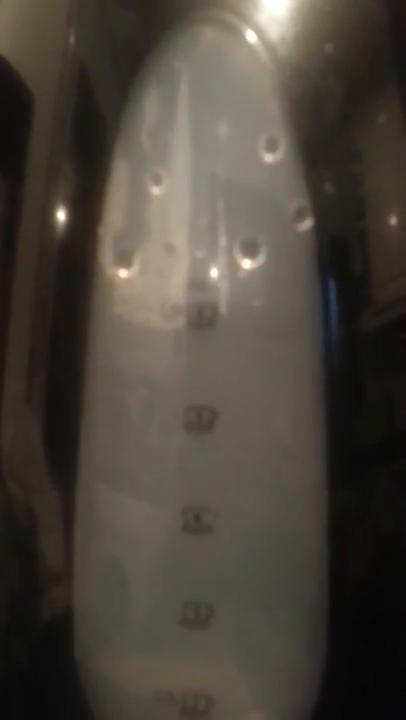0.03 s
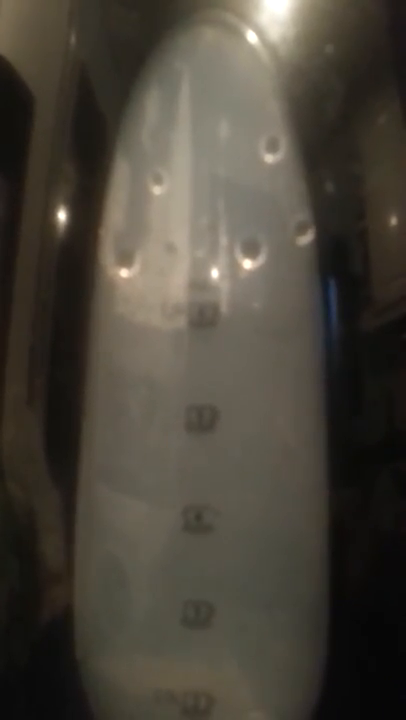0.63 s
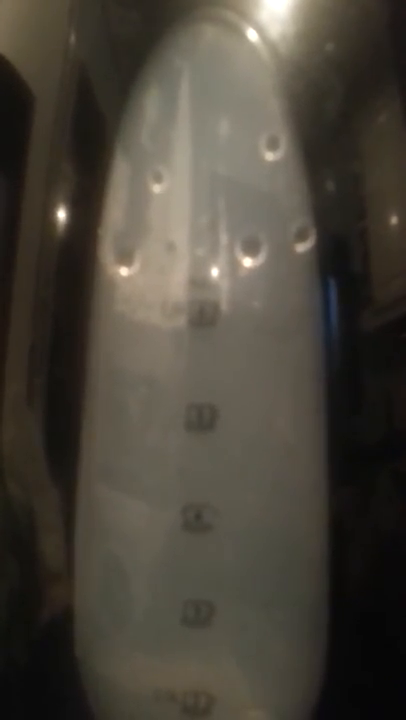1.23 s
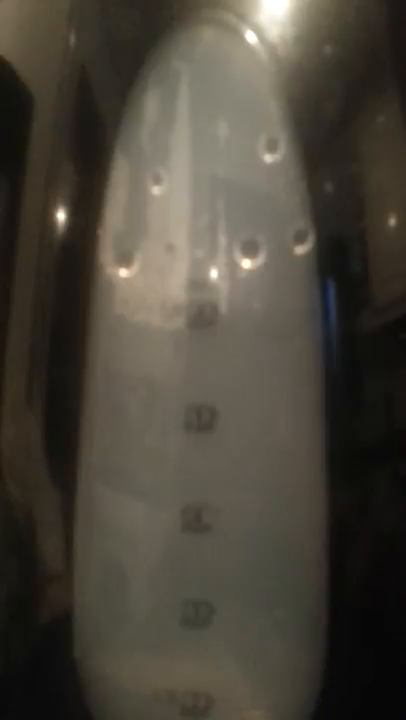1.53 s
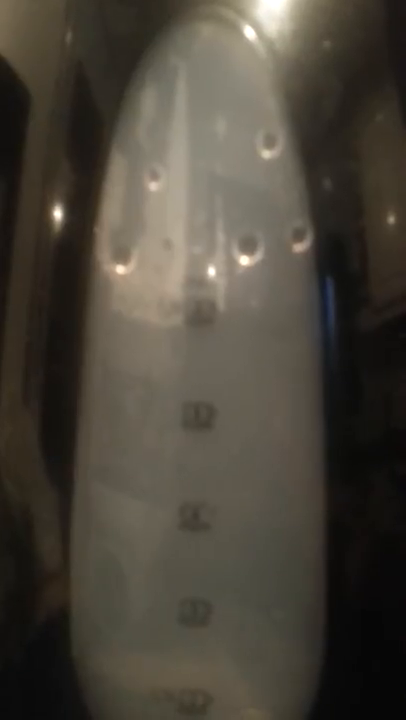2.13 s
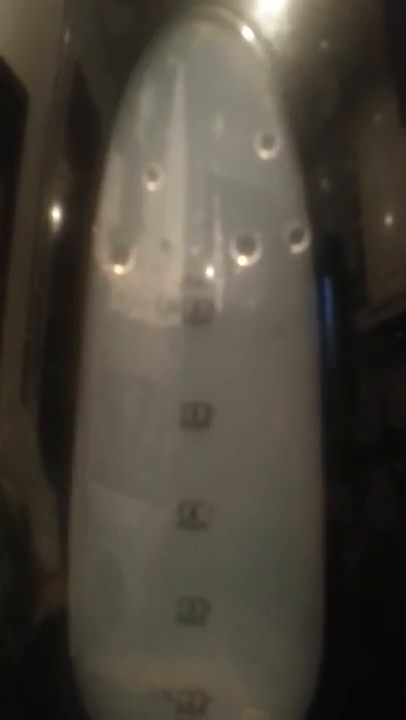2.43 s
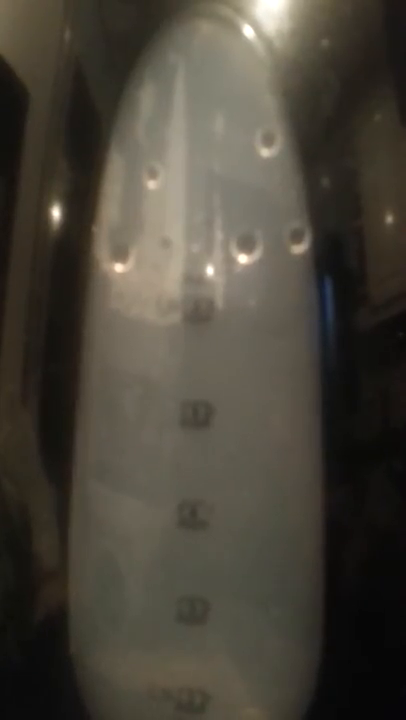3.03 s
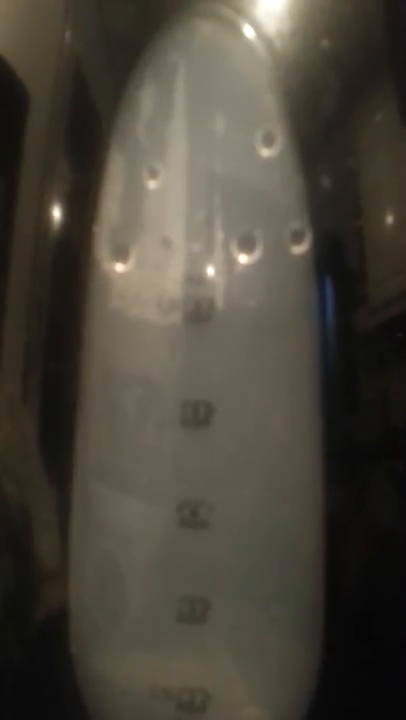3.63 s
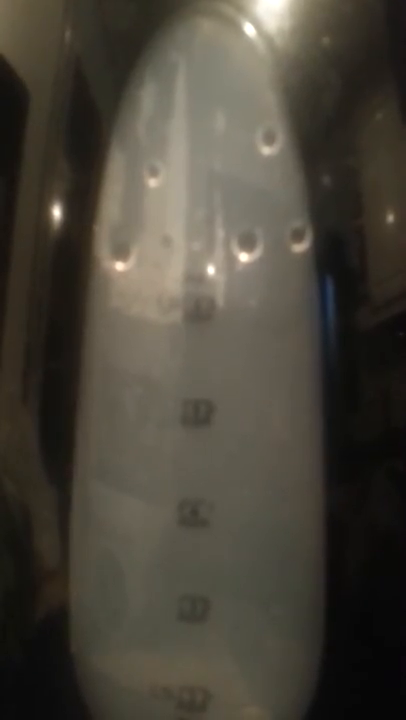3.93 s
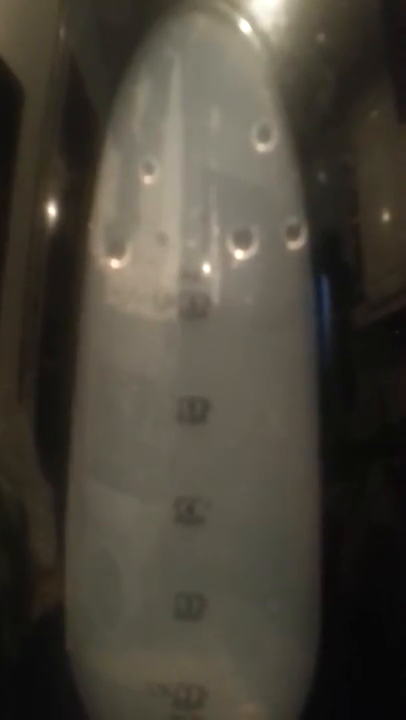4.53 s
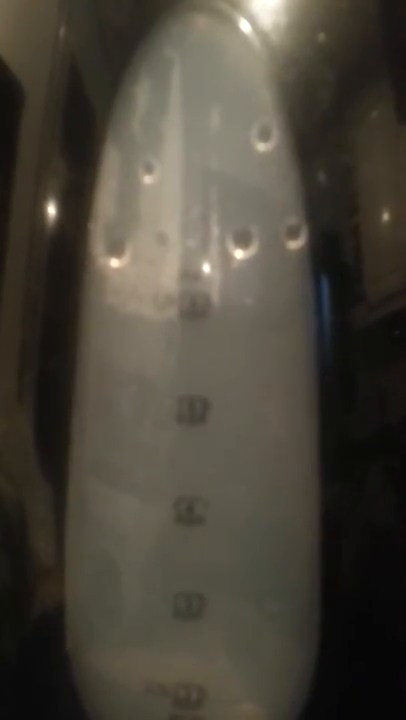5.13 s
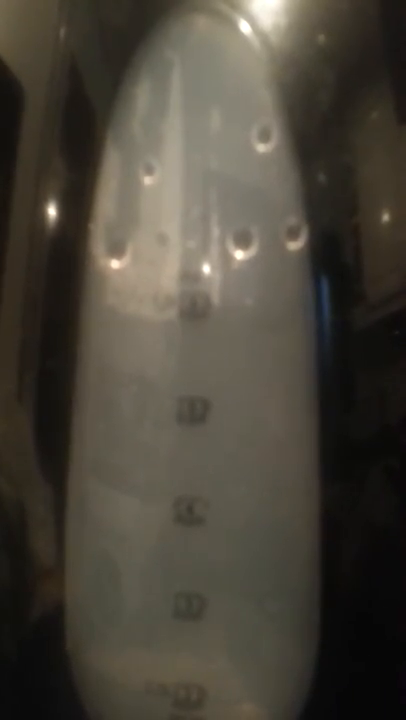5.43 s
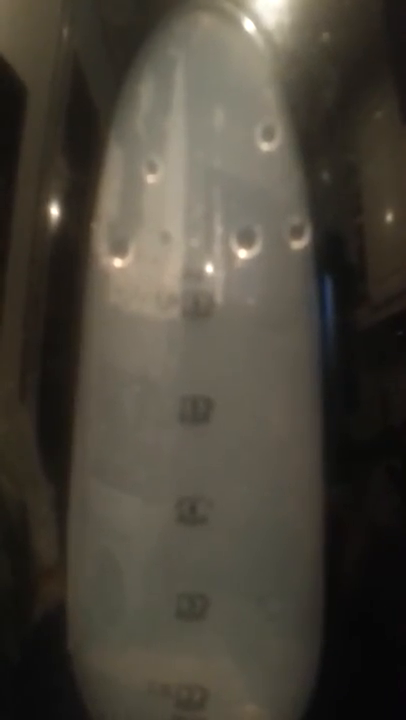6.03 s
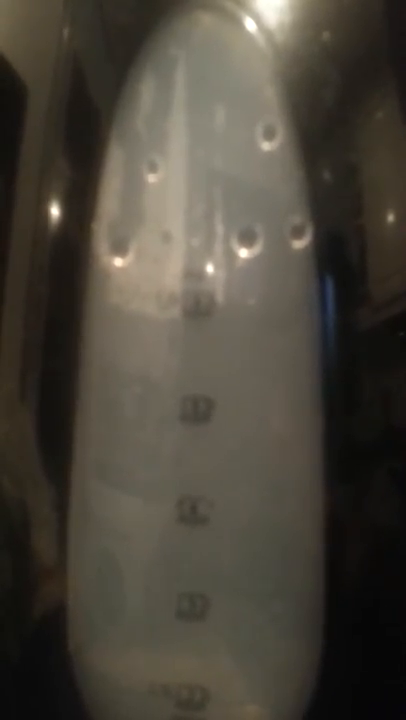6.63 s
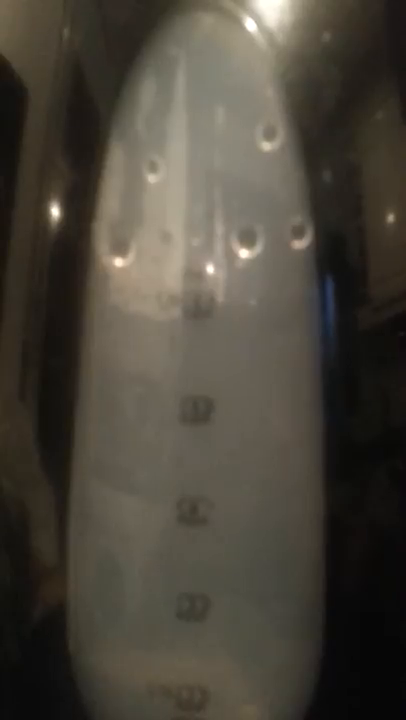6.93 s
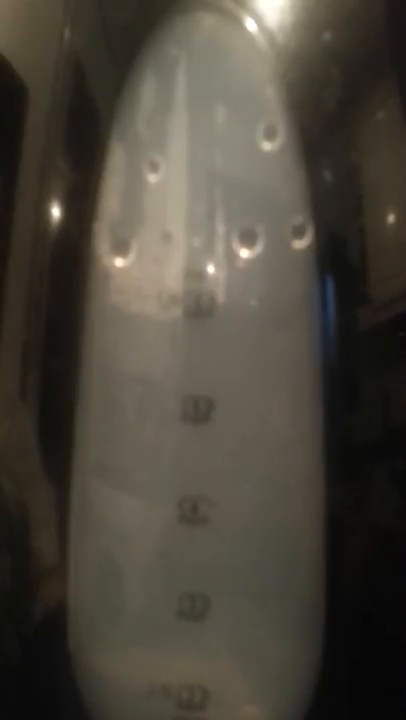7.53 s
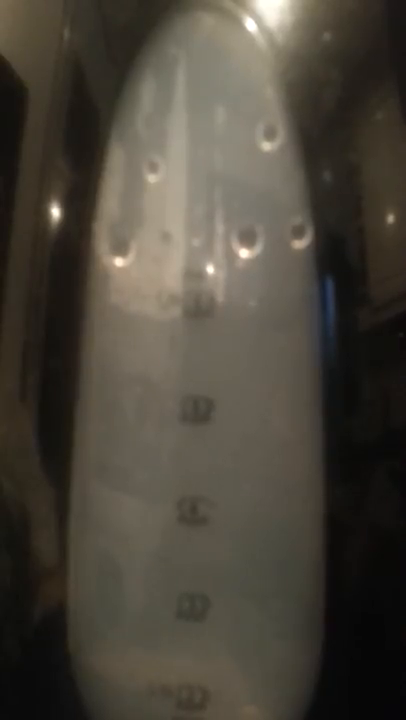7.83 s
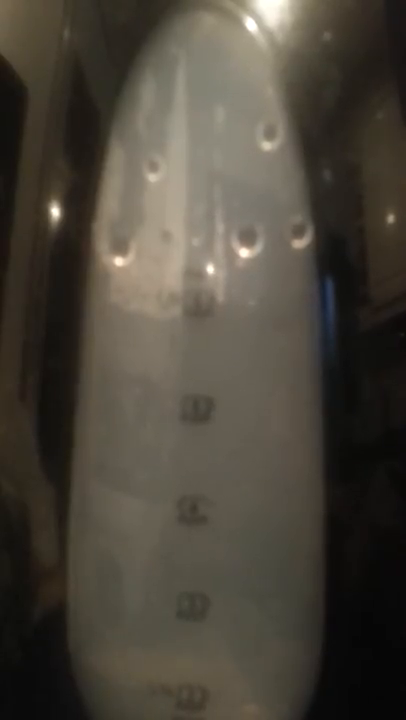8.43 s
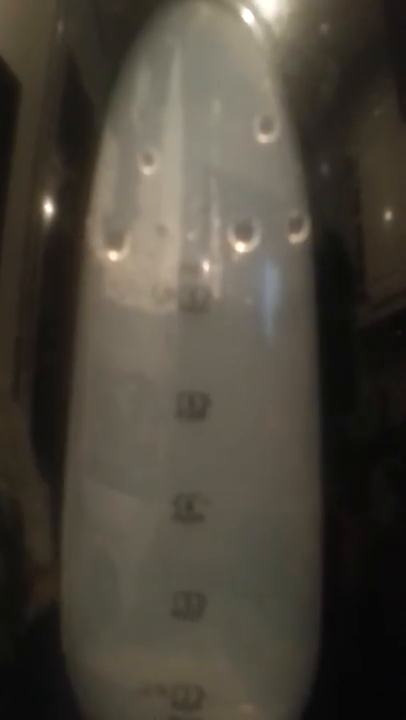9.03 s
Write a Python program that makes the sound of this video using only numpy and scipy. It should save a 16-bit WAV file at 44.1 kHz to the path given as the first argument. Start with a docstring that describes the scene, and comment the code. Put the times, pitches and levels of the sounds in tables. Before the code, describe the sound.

After a faint hum, water in an electric kettle begins to sizzle and builds to a steady rush with light gurgling.

```python
"""A small kitchen: an electric kettle starts to heat water, close by, over room air and a mains hum.
Steam bubbles form on the hot plate and collapse in the cooler water; each collapse knocks the kettle's
resonances. A fine sizzle grows into a rushing roar as the bubbles multiply and swell, with bigger ones
gurgling and popping through it. The worktop rumbles, three dry ticks sound, hard walls add a short tail."""
import sys
import numpy as np
from scipy import signal
from scipy.fft import rfft, irfft, next_fast_len
from scipy.io import wavfile
from scipy.ndimage import map_coordinates

SR = 44100
rng = np.random.default_rng(int(sys.argv[2]) if len(sys.argv) > 2 else 0)


def log_audio(samples):
    """Write samples as a 16-bit WAV file to the path given in sys.argv[1]."""
    # one column per channel
    frames = np.atleast_2d(samples).T
    # limit to full scale, then quantise
    limited = np.clip(frames, -1, 1)
    pcm = np.round(limited * 32767).astype(np.int16)
    wavfile.write(sys.argv[1], SR, pcm)


N = 410130
TIME_S = np.arange(N) / SR


def amp(db):
    """Decibels to gain."""
    return 10 ** (np.asarray(db) / 20)


def unit(x):
    """Scale to rms 1."""
    return x / np.sqrt(np.mean(x ** 2) + 1e-20)


def at_hz(rows, hz):
    """Read (Hz, value) rows on a log axis."""
    knots_hz, values = np.transpose(rows)
    return np.interp(np.log(hz + 1), np.log(knots_hz + 1), values)


def at_time(rows, t):
    """Read (seconds, value) rows at times t."""
    return np.interp(t, *np.transpose(rows))


def wobble(knots_per_s, t):
    """Smooth random curve at times t."""
    return map_coordinates(rng.standard_normal(4096), [t * knots_per_s], mode="mirror")


def filtered(x, response):
    """Apply a gain given as a function of Hz."""
    size = next_fast_len(N + SR // 2)
    return irfft(rfft(x, size) * response(np.fft.rfftfreq(size, 1 / SR)), size)[..., :N]


def noise(spectrum_db, likeness):
    """Stereo noise of rms 1 with a given colour and left-right likeness."""
    def mid_side_gains(hz):
        angle = np.arccos(at_hz(likeness, hz)) / 2
        return amp(at_hz(spectrum_db, hz)) * [np.cos(angle), np.sin(angle)]
    mid, side = filtered(rng.standard_normal((2, N)), mid_side_gains)
    return unit(np.array([mid + side, mid - side]))


# Each row: frequency in Hz, relative density in dB.
AIR_SPECTRUM_DB = [(76, -33), (130, -5), (220, -3.5), (255, 4), (305, 0), (350, -3), (420, -4.5),
                   (500, -3.5), (640, -3), (1000, -9.5), (2400, -14.5), (5800, -20), (9500, -34),
                   (14500, -73)]
# Each row: frequency in Hz, left-right likeness 0-1.
AIR_LIKENESS = [(60, 0.87), (240, 0.73), (950, 0.2), (3770, 0.04), (15000, 0.01)]


def room_air(level_db):
    """Steady air of a quiet room, wider in the treble."""
    return amp(level_db) * noise(AIR_SPECTRUM_DB, AIR_LIKENESS)


# Each row: time in seconds, level in dB.
HISS_LEVEL_DB = [(0, -60.5), (1.9, -59), (2.5, -55), (3.2, -80.5), (9.3, -93)]
# Each row: frequency in Hz, relative density in dB.
HISS_SPECTRUM_DB = [(5000, -41), (7000, -2), (9500, -1.5), (10500, -1), (14500, -3)]


def hiss():
    """Faint top hiss that fades away from about 2.5 s."""
    return amp(at_time(HISS_LEVEL_DB, TIME_S)) * noise(HISS_SPECTRUM_DB, likeness=[(100, 0.0037)])


# Each row: time in seconds, level in dB.
HUM_LEVEL_DB = [(0.1, -50), (1.26, -49.5), (2.08, -46), (2.79, -50), (4.84, -51.5), (5.42, -47.5),
                (5.8, -52.5), (8.84, -52.5), (9.2, -51)]
# Each row: harmonic number, relative level in dB.
HUM_HARMONICS = [(1, -1), (2, -36), (3, -14), (5, -18)]


def mains_hum(hz):
    """Mains hum with a few weak overtones."""
    tone = sum(amp(db) * np.sin(2 * np.pi * (k * hz * TIME_S + rng.random())) for k, db in HUM_HARMONICS)
    return amp(at_time(HUM_LEVEL_DB, TIME_S)) * unit(tone)


# Each row: frequency in Hz, relative density in dB.
WORKTOP_SPECTRUM_DB = [(20, -16.5), (40, -3), (70, 2), (130, 3), (170, 8.5), (210, -6.5), (255, 15),
                       (290, 0), (340, -31), (600, -86.5)]


def worktop_rumble(floor_db, shake_db):
    """Low rumble that grows as the kettle shakes the worktop."""
    boil_db, _, _ = boiling(TIME_S)
    gain = np.hypot(amp(floor_db), amp(boil_db + shake_db))
    return gain * noise(WORKTOP_SPECTRUM_DB, likeness=[(100, 0.37)])


# Each row: start in seconds, level in dB, pitch in Hz, t60 in seconds.
DRY_TICKS = [(0.1075, -25.5, 930, 0.0049), (5.47, -25.5, 12000, .002), (5.846, -32.5, 12300, 0.002)]


def ticks(spray_db, spray_t60_s):
    """Heavily damped rings, each with a little noisy spray at the same pitch."""
    out, t = np.zeros(N + SR), np.arange(SR // 20) / SR
    for start_s, db, hz, t60_s in DRY_TICKS:
        spray = amp(spray_db - 60 * t / spray_t60_s) * wobble(hz / 4, t)
        envelope = amp(db) * (amp(-60 * t / t60_s) + spray)
        out[round(start_s * SR):][:len(t)] += envelope * np.cos(2 * np.pi * hz * t - np.pi / 4)
    return out[:N]


# Each row: time in seconds, share of the plate bubbling 0-1.
BUBBLING_SHARE = [(1.7, .16), (2, .28), (2.5, .6), (3.2, 1)]


def collapses(per_s, spread_db, start_s=1.1):
    """Random times and log-normal sizes of collapses, sparse until the whole plate bubbles."""
    t = np.sort(rng.uniform(start_s, (N - 1) / SR, int(per_s * N / SR)))
    size = amp(spread_db * np.clip(rng.standard_normal(len(t)), -3, 2.3))
    alive = rng.random(len(t)) < at_time(BUBBLING_SHARE, t)
    return t[alive], size[alive]


def knocks(t, push, level_db):
    """Impulses, stronger when few; where a bubble sits decides which way it pushes a mode."""
    sparsity = 1 / at_time(BUBBLING_SHARE, t)
    gap_samples = (t[-1] - t[0]) * SR * sparsity / sparsity.sum()
    impulses = unit(push) * rng.choice([-1, 1], len(t)) * np.sqrt(gap_samples)
    return np.bincount((t * SR).astype(int), impulses * amp(level_db), N)


def ring(drive, hz, width_hz, left_db, right_db, lead_rad):
    """One steep-sided kettle resonance, in stereo."""
    section = np.concatenate(signal.iirpeak(hz, hz / width_hz, SR))
    left = signal.sosfilt([section, section], drive) * np.sqrt(2 * SR / (np.pi * width_hz))
    lag_samples = round(lead_rad / (2 * np.pi * hz) * SR)
    right = np.take(left, np.arange(left.shape[-1]) - lag_samples, axis=-1, mode="clip")
    return np.array([amp(left_db) * left, amp(right_db) * right])


# Each row: time in seconds, drive level in dB.
SINGING_DRIVE_DB = [(1.1, -82), (1.35, -69.5), (1.55, -62.5), (1.7, -53), (1.95, -49.3), (2.05, -45),
                    (2.4, -41.5), (3, -40.5), (4.2, -53), (6, -52), (9.3, -49)]
# Each row: frequency in Hz, width in Hz, left gain in dB, right gain in dB, left lead in radians.
PLATE_MODES = [(376, 71, 0, -5.5, 0.36), (551, 110, -3, -6.5, 1), (1310, 69, -9, -12, -0.6),
               (1690, 90, -14, -17, -0.5), (2270, 75, -8.5, -16, 0), (2750, 70, -16, -14.5, 1.5),
               (3490, 170, -3, -2.5, 0.2), (3747, 180, -4.5, -4, 0.6), (3960, 700, 3, -0.5, -2),
               (4550, 290, -11, -15, 0.5), (5010, 400, -4.5, -13, 1.5), (5640, 420, -9, -7.5, -1.5),
               (7150, 2800, -4.5, -9, 1.5), (9040, 900, -13.5, -31, 0)]


def singing(per_s, spread_db):
    """The first tiny bubbles ring a few resonances on the plate."""
    t, size = collapses(per_s, spread_db)
    drive_db = at_time(SINGING_DRIVE_DB, t)
    return sum(ring(knocks(t, size, drive_db), *mode) for mode in PLATE_MODES)


# Each row: time in seconds, drive level in dB.
SIMMER_DRIVE_DB = [(1.2, -82), (1.5, -64), (1.665, -56.5), (1.685, -49), (1.99, -45), (2.015, -39.5),
                   (2.19, -39.5), (2.23, -36), (2.7, -31.5), (3.35, -27), (4.4, -27), (4.9, -28),
                   (5.55, -26), (5.85, -27.5), (6.6, -26), (7.8, -26.5), (9.3, -23.5)]
# Each row: start in seconds, hold in seconds, lift in dB.
BUBBLE_SWARMS = [(3.671, 0.03, 5), (4.233, 0.017, 6.5), (4.98, 0.071, 4.5), (5.106, 0.1, 4),
                 (5.262, 0.12, 4), (5.429, 0.086, 4), (6.342, 0.027, 1), (6.486, 0.035, 3),
                 (6.976, 0.043, 4), (7.141, 0.12, 3), (7.873, 0.093, 4), (8.06, 0.045, 3),
                 (8.164, 0.04, 2.5), (8.488, 0.033, 4), (8.582, 0.04, 4), (9.048, 0.11, 3)]


def boiling(t, settled_db=-26, attack_s=0.0053, release_s=0.048):
    """Level, bass and treble in dB: growing bubbles deepen and dull the roar, swarms lift its middle."""
    swarm_db = 0
    for start_s, hold_s, lift_db in BUBBLE_SWARMS:
        rise = np.clip((t - start_s) / attack_s, 0, 1)
        fall = np.exp(-np.maximum(t - start_s - hold_s, 0) / release_s)
        swarm_db += lift_db * rise * fall
    steady_db = at_time(SIMMER_DRIVE_DB, t)
    growth_db = steady_db - settled_db
    bass_db = 0.12 * growth_db - 0.15 * swarm_db
    treble_db = -0.18 * growth_db - 0.32 * swarm_db
    return steady_db + swarm_db, bass_db, treble_db


# Each row: frequency in Hz, width in Hz, left gain in dB, right gain in dB, left lead in radians.
KETTLE_MODES = [(319, 17, -15, -16, -0.5), (350, 62.4, -11, -12.5, 0), (392.08, 43, -11, -16.5, 0.07),
                (500.2, 46, -13.5, -18.5, 1.0), (537, 53, -8.5, -13.5, 1.0), (588, 68, -17.5, -20.5, 0.4),
                (630.4, 44, -12.5, -16.5, 0.56), (681, 63, -19.5, -21.5, 0.55), (825, 95, -15, -14, 1.44),
                (909, 250, -10.5, -17.5, 0.5), (1130, 250, -15, -7.5, 3), (1211, 120, -9.5, -23.5, -2),
                (1291.5, 28, -12.5, -14.5, 2), (1311, 58, -16.5, -8.5, 3), (1350, 174, -8, -12.5, 0.5),
                (1476, 36, -16, -24, -1.5), (1509, 180, -6, -11.5, -2.5), (1653.5, 99, -9, -15, -1.1),
                (1729, 120, -12.5, -12.5, -1), (1927, 170, -19, -10.5, -3), (2021, 82, -13, -28.5, 0.4),
                (2078, 69, -12, -29, 2.1), (2196, 87, -8.5, -23.5, 4), (2270, 82, -8.5, -14.5, 0.82),
                (2500, 280, -9, -14.5, 1.7), (2763, 116, -12, -17, 1), (2875, 370, -10, -17, 1),
                (3152, 195, -8, -21, 2), (3368, 240, -9.5, -24.5, 2), (3530, 360, -16, -16, -0.5),
                (3794, 400, -21.5, -12.5, -1.65), (4140, 810, -12, -22, 1.7), (4520, 300, -20.5, -25, 1),
                (5200, 520, -20, -24.5, 1), (5660, 490, -21, -23.5, 2), (6446, 1900, -23, -23, 1.3),
                (7910, 820, -24.5, -40, 4), (9730, 1540, -26, -53, 2)]
# Ring below 450 Hz. Each row: time in seconds, lift in dB before weighting.
LOW_RING_DB = [(1.7, -5), (2.4, 0), (3.3, 1.8), (4.4, 1), (5, 0.5), (5.7, 3), (6.5, -0.5), (7, -0.8),
               (9.3, -1)]
# Ring near 2.2 kHz. Each row: time in seconds, lift in dB before weighting.
MID_RING_DB = [(2, 2), (3.3, 1.5), (4.8, 2), (5.4, 0), (6.2, -0.8), (9.3, -2)]


def simmer(per_s, spread_db, clump_db, clumps_per_s, corner_hz, gain_db):
    """Thousands of collapses a second ring the kettle, in clumps; big bubbles are louder and duller."""
    t, size = collapses(per_s, spread_db)
    size *= amp(clump_db * wobble(clumps_per_s, t))
    level_db, bass_db, treble_db = boiling(t)
    bass_db += 2.05 * wobble(30, t)  # the low knocks come and go
    low_db, mid_db = at_time(LOW_RING_DB, t), at_time(MID_RING_DB, t)
    mid_weights = [(1400, -0.14), (1650, 0.48), (1930, -1.1), (2050, 0.17),
                   (2200, 1.3), (2300, 1.3), (2500, -1.1), (2900, 0.021)]
    out = np.zeros((2, N))
    for hz, *mode in KETTLE_MODES:
        # Each mode follows the four curves with a weight set by its frequency.
        colour_db = at_hz([(400, 1.0), (620, 0.12), (1100, 0.0054)], hz) * (bass_db - 0.5)
        colour_db += at_hz([(1900, 0.27), (3400, 0.51)], hz) * (treble_db + 0.46)
        colour_db += at_hz(mid_weights, hz) * mid_db
        colour_db += at_hz([(420, 0.87), (480, 0.011)], hz) * low_db
        push = size / np.hypot(1, hz * size / corner_hz)
        ringing = ring(knocks(t, push, level_db + colour_db + gain_db), hz, *mode)
        out += cloud_drift(ringing) if 1400 < hz < 3000 else ringing
    return out


def cloud_drift(x, start_s=4.44, swing_s_per_s=0.0001, bends_per_s=9):
    """Passing bubble clouds bend a resonance's pitch, more as the water warms."""
    t = TIME_S[::128]
    delay_s = swing_s_per_s * np.maximum(t - start_s, 0) * wobble(bends_per_s, t)
    bent_s = TIME_S - np.interp(TIME_S, t, delay_s)
    return np.array([np.interp(bent_s, TIME_S, side) for side in x])


def dry_knock(cycles, crest_cycles=0.56, sharp_share=0.17, pan_db=3):
    """Knocks of collapsing bubbles, one per row: they start sharp, sag in pitch and lean left."""
    age = cycles / crest_cycles
    extra_turns = 2 * sharp_share * crest_cycles * (1 - np.exp(-age / 2))
    turns = cycles + extra_turns + rng.random((len(cycles), 1))
    knock = age * np.exp(-age) * np.sin(2 * np.pi * turns)
    return knock * amp([pan_db, -pan_db])[:, None, None]


# Each row: start in seconds, relative level in dB, pitch in Hz, dry knock's share of the power 0-1.
BUBBLE_POPS = [(1.610, -58, 1700, .2), (1.682, -49, 2200, 0), (1.684, -51.5, 420, 0),
               (1.701, -54, 2250, .1), (1.767, -52, 2120, 0.1), (1.866, -55, 1350, .3),
               (1.907, -52, 1310, 0.1), (1.951, -51, 2200, .2), (2.012, -44, 1400, .2),
               (2.11, -41, 1340, 0.2), (2.206, -43, 520, 0), (2.31, -49, 400, .2), (2.335, -37, 1300, .2),
               (2.449, -36.5, 380, 0), (2.553, -39, 357, .2), (2.662, -35, 374, 0.16),
               (2.832, -33.5, 560, 0.3), (2.935, -33, 540.3, .2), (3.093, -33, 700, .3),
               (3.108, -31, 403, 0.3), (3.158, -33.5, 760, .3), (3.27, -31.5, 2200, 0.2),
               (3.281, -29, 420, 0.01), (3.325, -32, 440, 0.2), (3.448, -30, 360.2, 0.05),
               (3.521, -31.5, 597, 0.49), (3.691, -32, 1300, .3), (3.701, -25.5, 427, 0.3),
               (3.764, -33, 520, 0.6), (3.784, -29, 680, 0.5), (3.791, -29.5, 397, 0.2),
               (3.837, -31.5, 660, 0.5), (4.036, -29, 560.3, 0), (4.069, -30, 700, 0.1),
               (4.128, -28.5, 414, 0.24), (4.162, -29, 490, 0.1), (4.239, -27.5, 570, .7),
               (4.246, -29, 420, 0.56), (4.248, -29, 1300, .15), (4.379, -28, 500, .4),
               (4.579, -32.5, 463.3, 0.19), (4.646, -40, 819.4, 0.3), (4.672, -33, 1280, .2),
               (4.766, -37, 476, 0.5), (4.768, -30, 2200, 0.3), (4.818, -31.5, 670, 0.1),
               (4.99, -30, 550, 0.45), (5.005, -32, 517, 0.5), (5.049, -35, 660, 0.5),
               (5.128, -30, 560, 0.55), (5.196, -31, 560, 0.3), (5.279, -28.5, 560, 0.3),
               (5.347, -34, 760, 0.31), (5.437, -27, 630, 0.36), (5.468, -26.5, 540, 0.6),
               (5.488, -25, 760, 0), (5.583, -36, 760, 0.7), (5.732, -33.5, 540, 0.5),
               (5.774, -37, 495.8, .6), (5.822, -41, 600, .6), (5.953, -34, 580, 0.2),
               (6.199, -32, 620, 0.4), (6.252, -35, 660, 0.7), (6.357, -32.5, 764, 0.3),
               (6.384, -33, 640, .7), (6.494, -26.5, 419.7, 0.26), (6.517, -31, 557, 0.4),
               (6.851, -32.5, 596, 0.2), (6.987, -31, 700.4, 0), (7.156, -31, 1050, 0.2),
               (7.189, -33, 660, 0.6), (7.217, -32, 720, 0.2), (7.251, -33.5, 580, 0.4),
               (7.526, -30, 480, 0), (7.683, -32, 480, 0.1), (7.727, -31, 500.2, 0.2),
               (7.884, -24.5, 480, 0.75), (7.905, -29, 450, .2), (7.955, -38, 360, 0.3),
               (8.025, -33, 440, 0.5), (8.066, -29, 500, .3), (8.11, -32, 760, 0.3),
               (8.167, -25.5, 620, 0.6), (8.168, -29, 1700, 0.2), (8.492, -28.5, 2200, 0.16),
               (8.498, -36, 1290, .2), (8.525, -36, 560, 0.1), (8.597, -26.5, 600, 0.3),
               (8.709, -30, 700, .4), (8.85, -30.5, 700, 0.2), (8.91, -28.5, 749.4, 0.29),
               (9.02, -28, 450, 0.1), (9.089, -26, 900, 0.3), (9.202, -29, 400, 0.1)]


def pops(t60_cycles, pitch_q, damping_hz, highpass_hz, top_mode_hz, gain_db):
    """Single bubbles collapse with a knock; their rebounds ring the kettle's modes near their pitch."""
    out, t = np.zeros((2, N + SR)), np.arange(SR // 16) / SR
    starts_s, level_db, pitch_hz, dry_share = np.transpose(BUBBLE_POPS)
    cycles = t * pitch_hz[:, None]
    rebounds = amp(-60 * cycles / t60_cycles)
    body = 0
    for hz, width_hz, *stereo in KETTLE_MODES:
        if hz < top_mode_hz:
            coupling = 1 / np.hypot(1, pitch_q * (hz / pitch_hz - pitch_hz / hz))
            drive = coupling[:, None] * rebounds * rng.standard_normal(rebounds.shape)
            body += ring(drive, hz, width_hz + damping_hz, *stereo)
    highpass = signal.butter(4, highpass_hz, "highpass", fs=SR, output="sos")
    body, knock = signal.sosfilt(highpass, [body, dry_knock(cycles)])
    for i, start_s in enumerate(starts_s):
        pop = np.sqrt(dry_share[i]) * unit(knock[:, i]) + np.sqrt(1 - dry_share[i]) * unit(body[:, i])
        out[:, round(start_s * SR):][:, :len(t)] += amp(level_db[i] + gain_db) * unit(pop)
    return out[:, :N]


# Each row: frequency in Hz, gain in dB.
KETTLE_WALL_DB = [(8550, 0), (8800, -3.5), (9000, -0.5), (9900, 0.5), (10500, -29.5)]


def kettle_wall(x):
    """Little of the top treble gets out of the kettle."""
    return filtered(x, lambda hz: amp(at_hz(KETTLE_WALL_DB, hz)))


# Each row: frequency in Hz, t60 in seconds.
KITCHEN_T60_S = [(200, 0.28), (2000, 0.17), (10000, 0.23)]
# Each row: frequency in Hz, wet-to-dry ratio in dB.
KITCHEN_WET_DB = [(300, -19), (1000, -10), (2500, -13.5), (4000, -12), (8000, 0.5)]


def kitchen(x):
    """Hard walls add a short stereo tail, strongest in the treble, shifting as the bubbles move."""
    wet, hop = np.zeros((2, N + 2 * SR)), SR // 2
    padded, fade = np.pad(x, [(0, 0), (0, SR)]), signal.windows.cosine(2 * hop)
    for start in range(0, N, hop):
        hz, t, spectra = signal.stft(rng.standard_normal((2, SR // 6)), SR, nperseg=256)
        decay = amp(-60 * t / at_hz(KITCHEN_T60_S, hz)[:, None])
        _, tail = signal.istft(spectra * decay, SR, nperseg=256)
        block = fade * padded[:, start:start + 2 * hop]
        echo = signal.fftconvolve(block, tail / np.linalg.norm(tail[0]), axes=1)
        wet[:, start:start + echo.shape[1]] += echo
    mix = x + filtered(wet[:, :N], lambda hz: amp(at_hz(KITCHEN_WET_DB, hz)))
    return filtered(mix, lambda hz: 1 / np.hypot(1, amp(at_hz(KITCHEN_WET_DB, hz))))  # constant power


def scene():
    """The kettle in its room, over the background."""
    water = singing(per_s=2600, spread_db=2.5)
    water += simmer(per_s=4500, spread_db=6.5, clump_db=1.5, clumps_per_s=60,
                    corner_hz=2940, gain_db=-0.04)
    water += pops(t60_cycles=12.8, pitch_q=1.6, damping_hz=32, highpass_hz=265,
                  top_mode_hz=2400, gain_db=-2.04)
    foreground = kitchen(kettle_wall(water)) + ticks(spray_db=-18.5, spray_t60_s=0.035)
    drone = mains_hum(hz=100) + worktop_rumble(floor_db=-63, shake_db=-32.5)
    return foreground + drone + hiss() + room_air(level_db=-54)


def record(dry):
    """Brick-wall low-pass."""
    return filtered(dry, lambda hz: hz < 14600)


dry = scene()
out = record(dry)
log_audio(out)
```